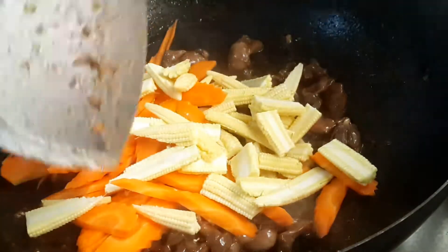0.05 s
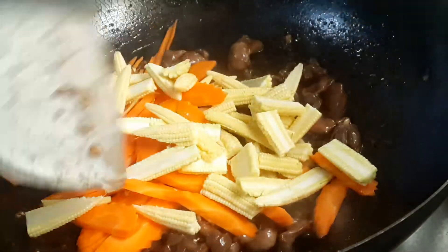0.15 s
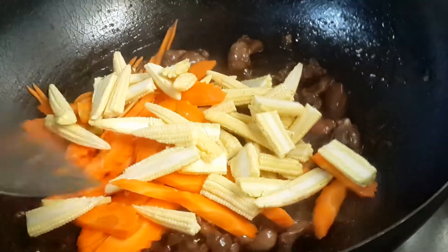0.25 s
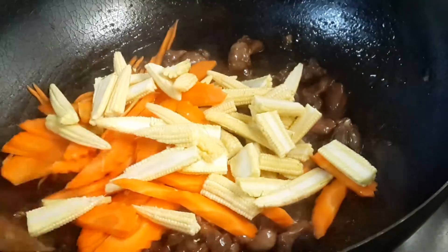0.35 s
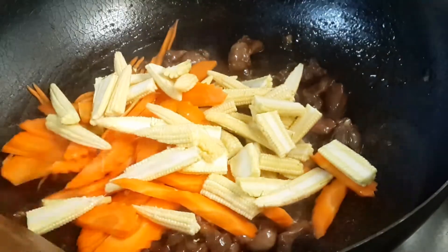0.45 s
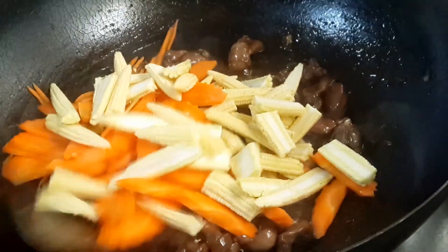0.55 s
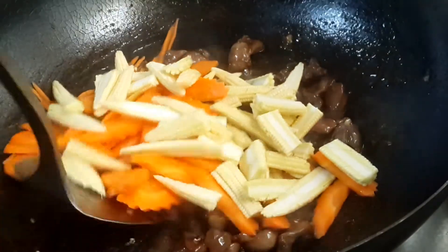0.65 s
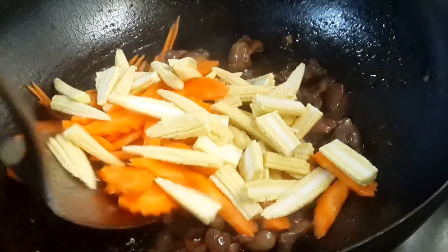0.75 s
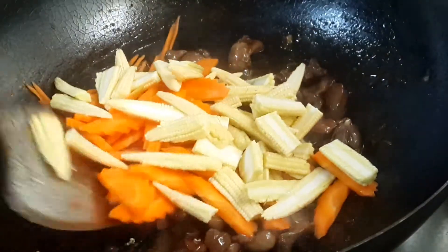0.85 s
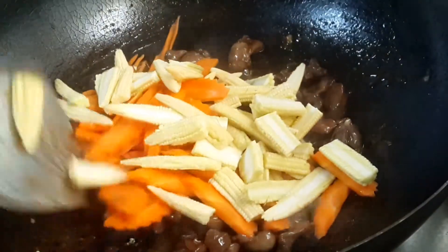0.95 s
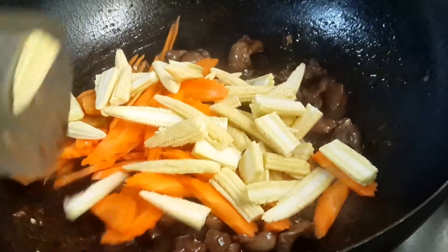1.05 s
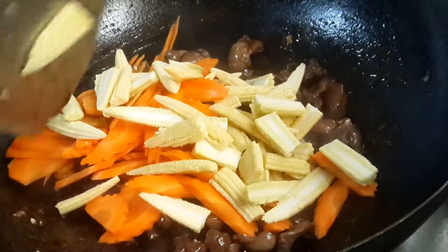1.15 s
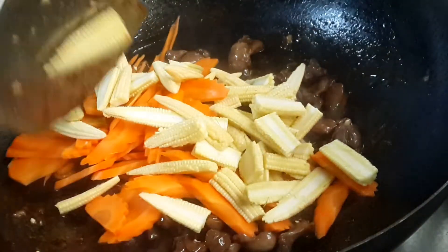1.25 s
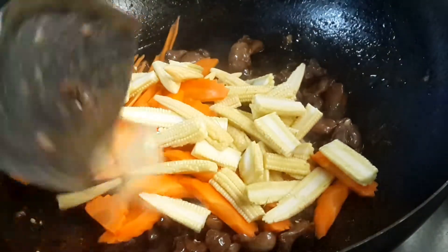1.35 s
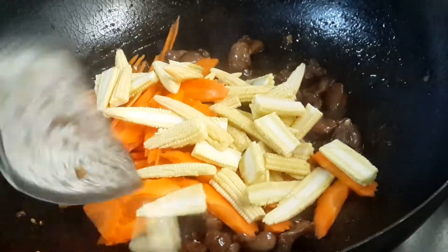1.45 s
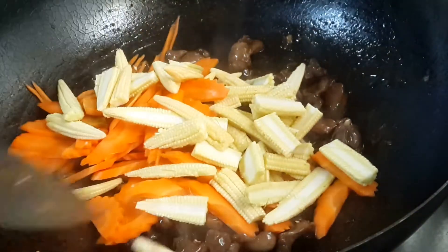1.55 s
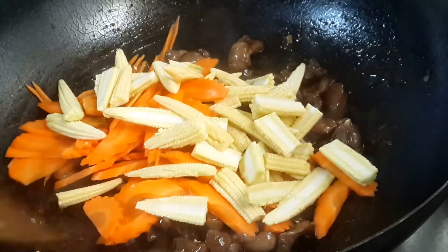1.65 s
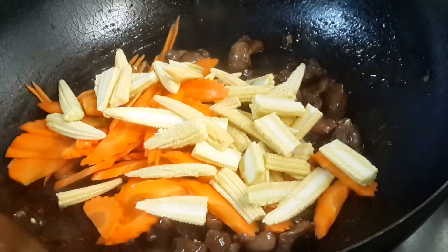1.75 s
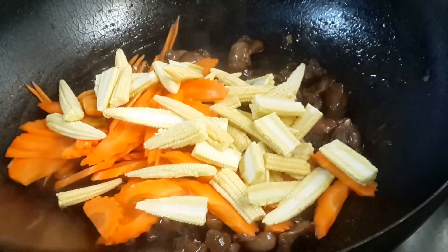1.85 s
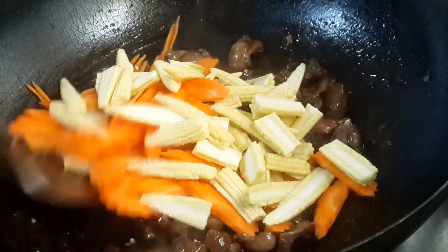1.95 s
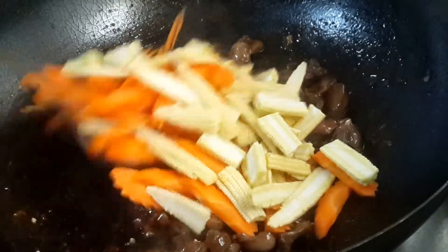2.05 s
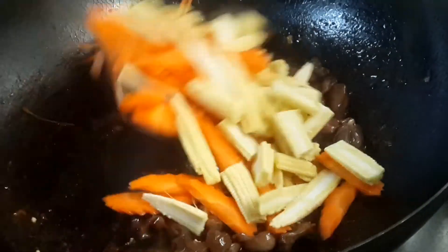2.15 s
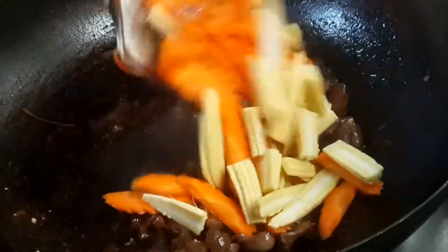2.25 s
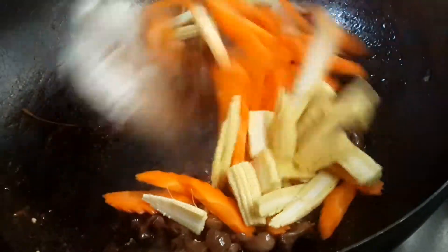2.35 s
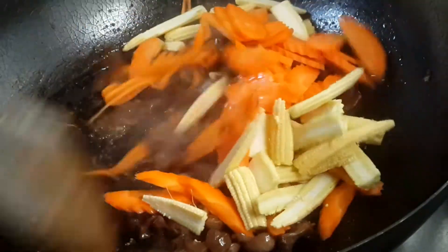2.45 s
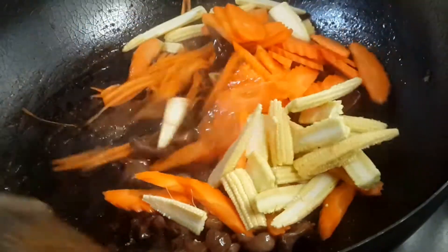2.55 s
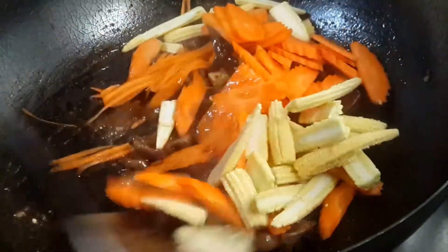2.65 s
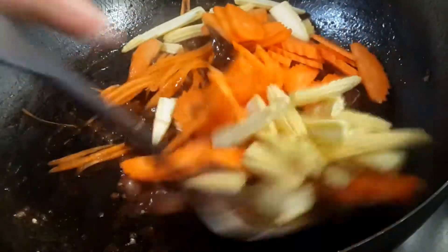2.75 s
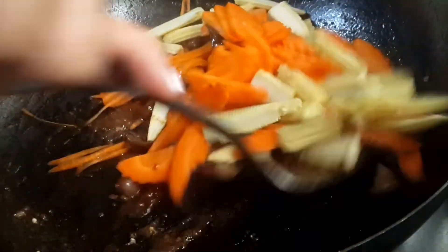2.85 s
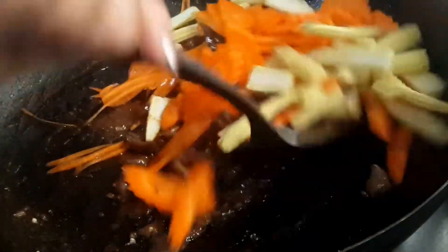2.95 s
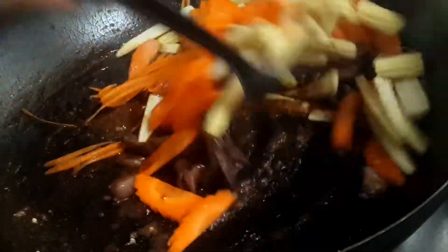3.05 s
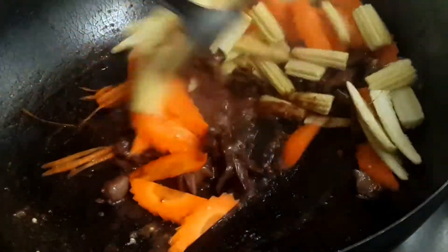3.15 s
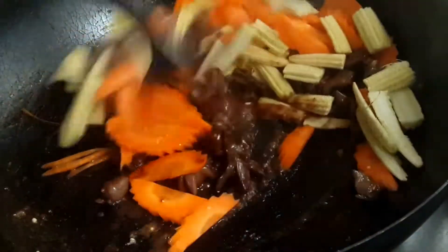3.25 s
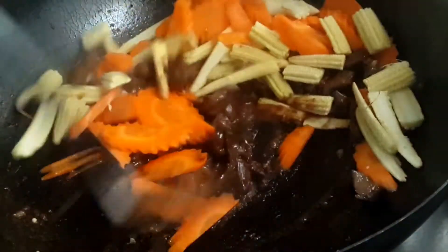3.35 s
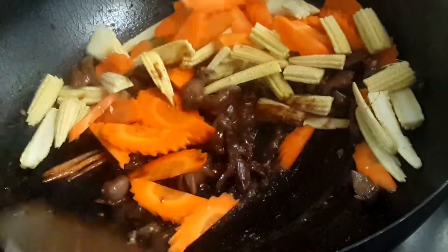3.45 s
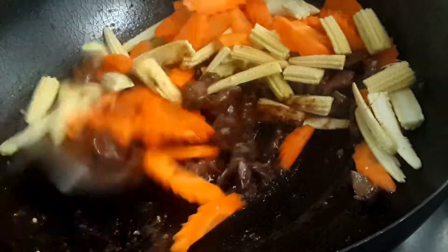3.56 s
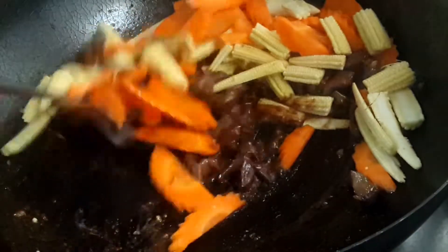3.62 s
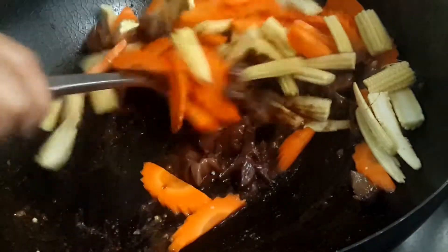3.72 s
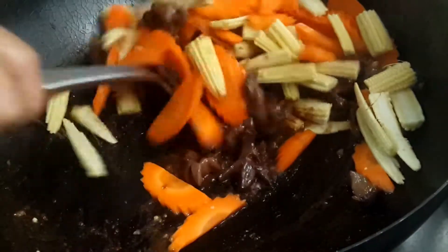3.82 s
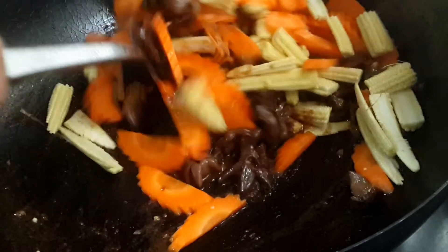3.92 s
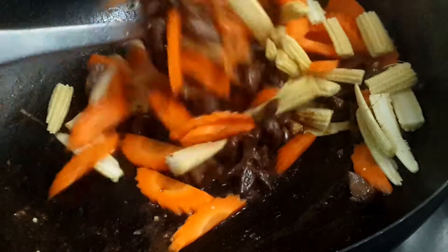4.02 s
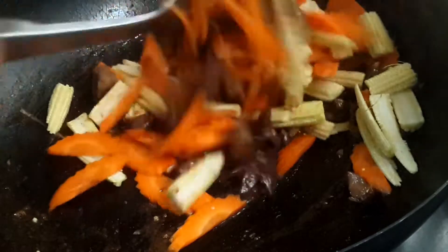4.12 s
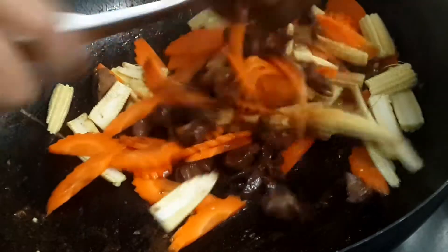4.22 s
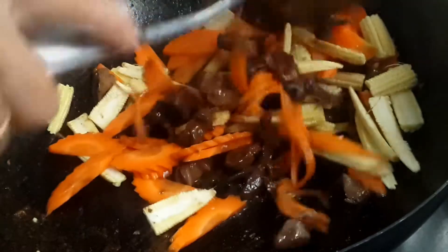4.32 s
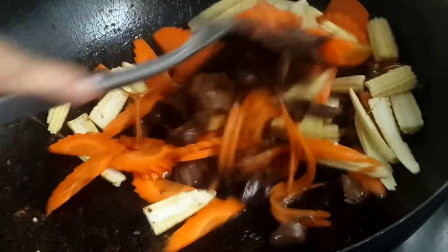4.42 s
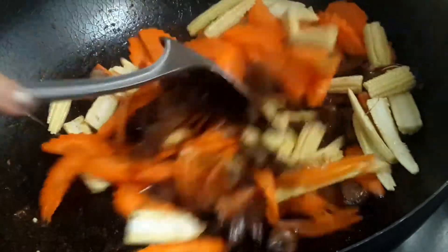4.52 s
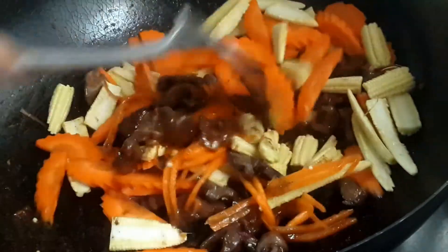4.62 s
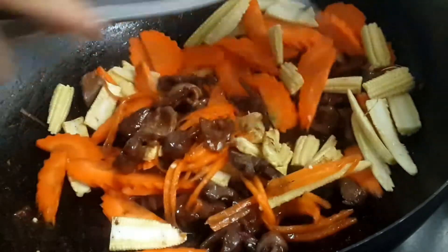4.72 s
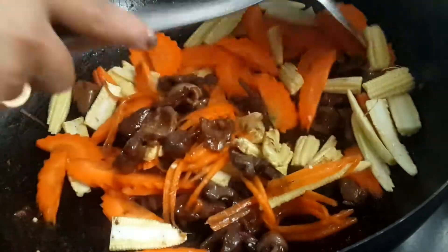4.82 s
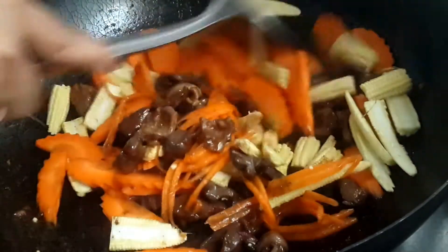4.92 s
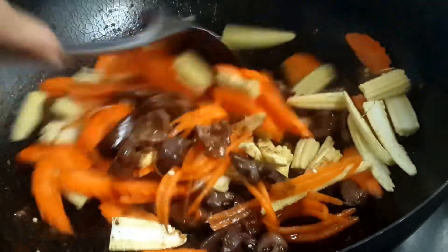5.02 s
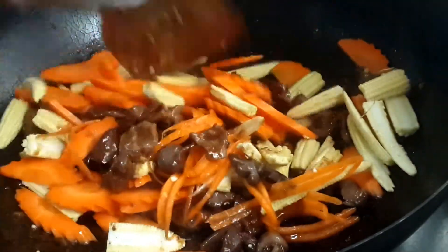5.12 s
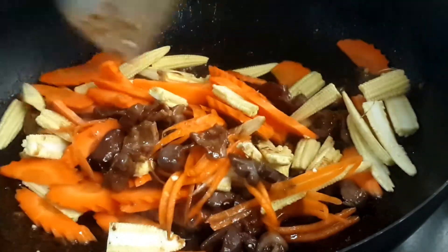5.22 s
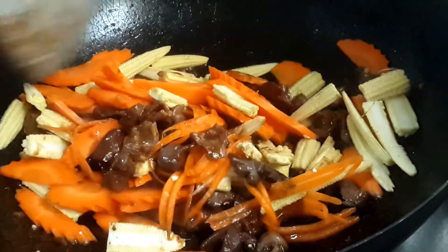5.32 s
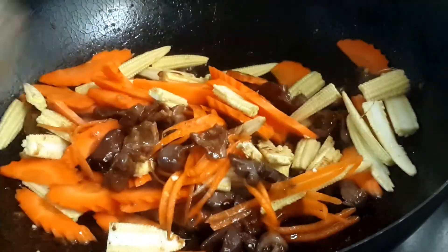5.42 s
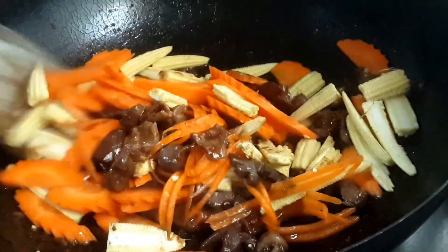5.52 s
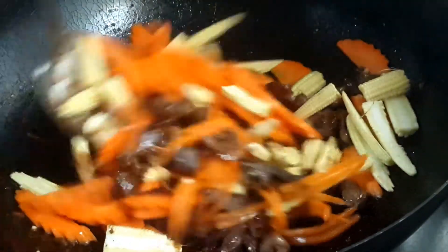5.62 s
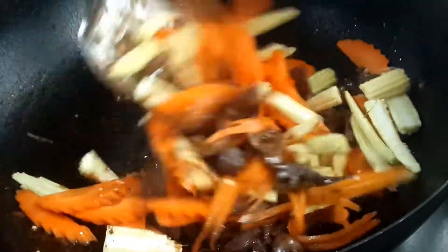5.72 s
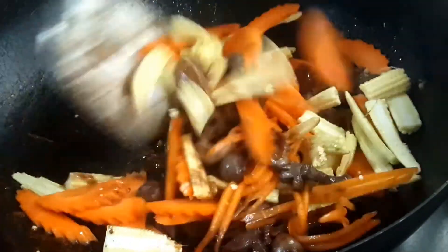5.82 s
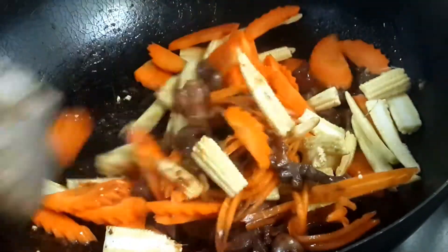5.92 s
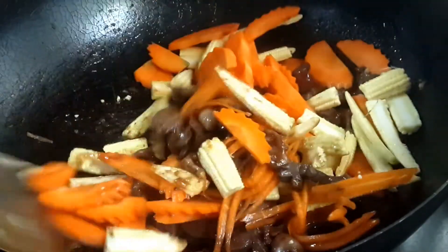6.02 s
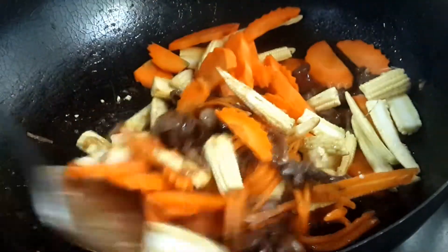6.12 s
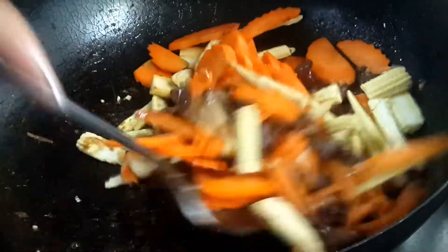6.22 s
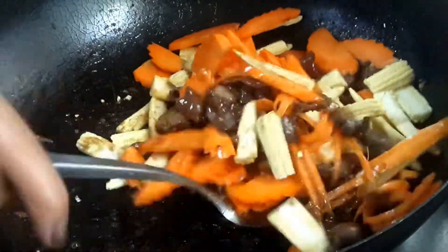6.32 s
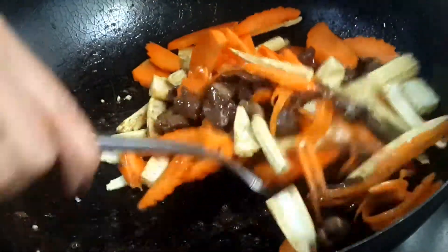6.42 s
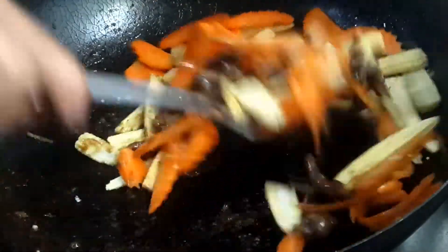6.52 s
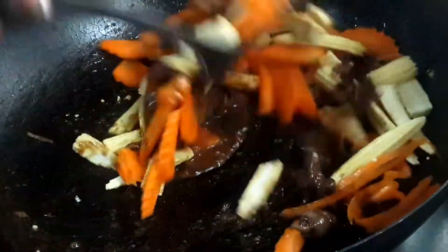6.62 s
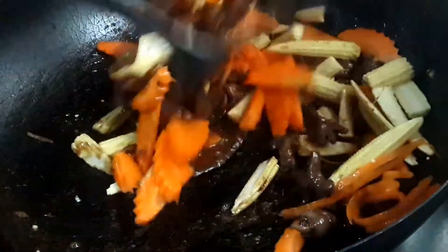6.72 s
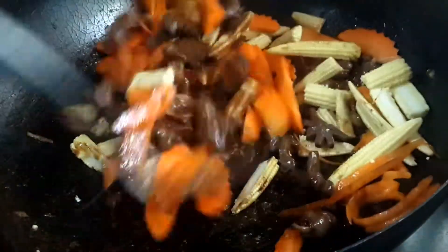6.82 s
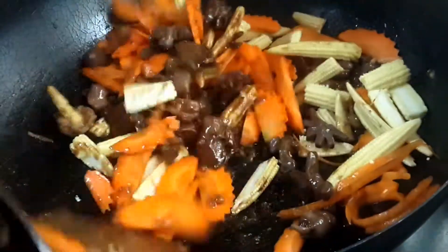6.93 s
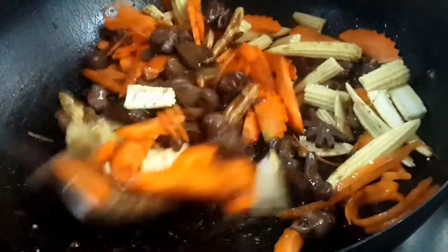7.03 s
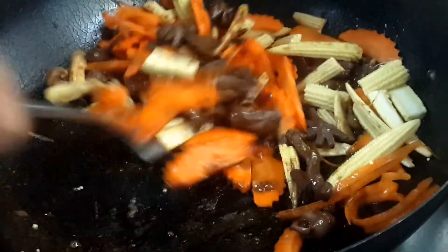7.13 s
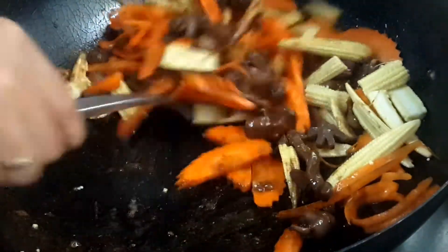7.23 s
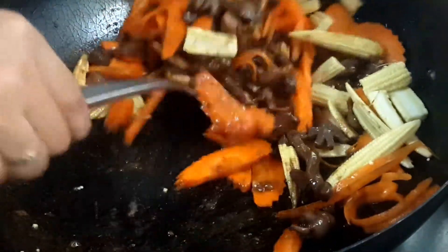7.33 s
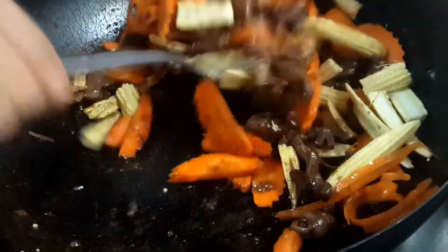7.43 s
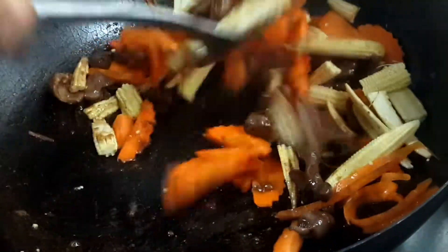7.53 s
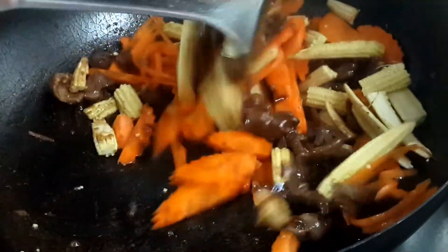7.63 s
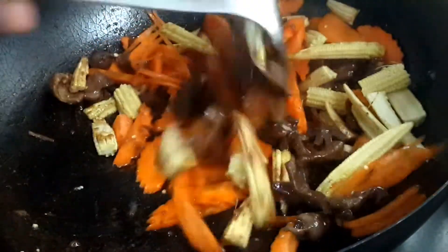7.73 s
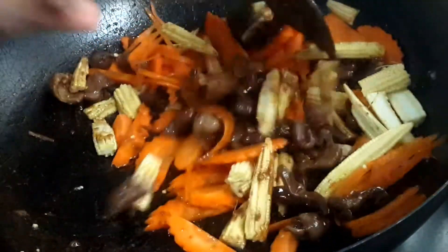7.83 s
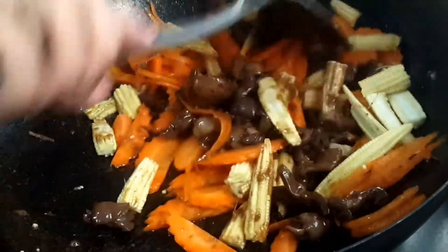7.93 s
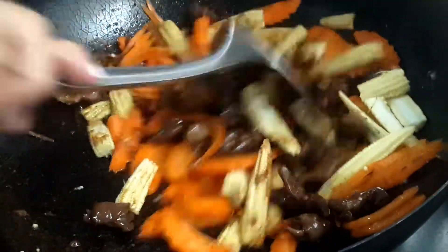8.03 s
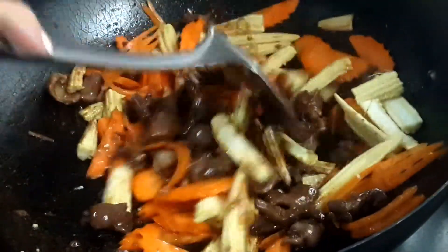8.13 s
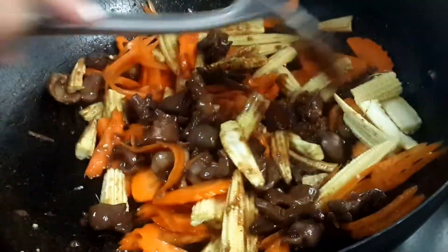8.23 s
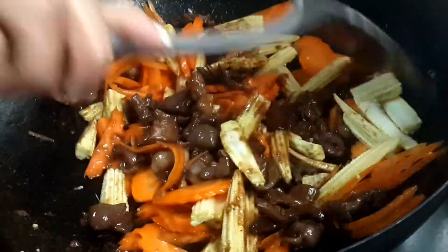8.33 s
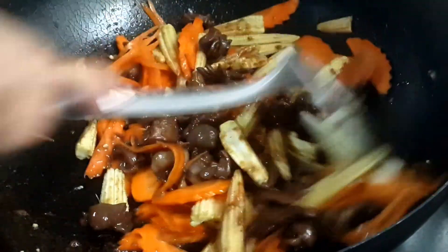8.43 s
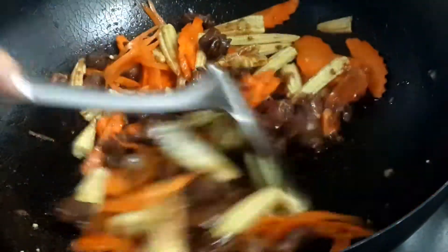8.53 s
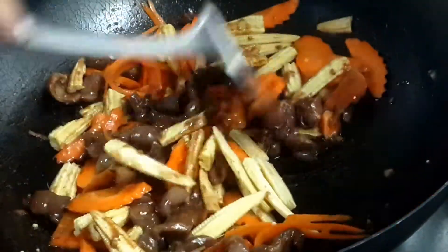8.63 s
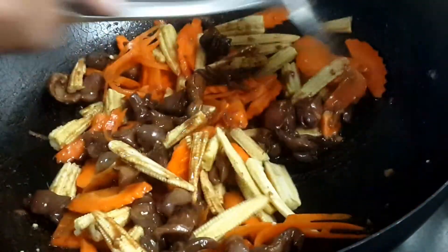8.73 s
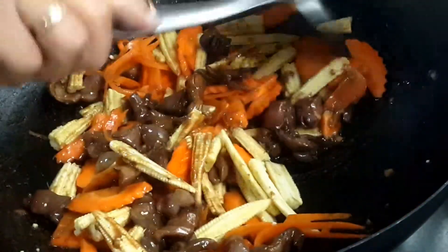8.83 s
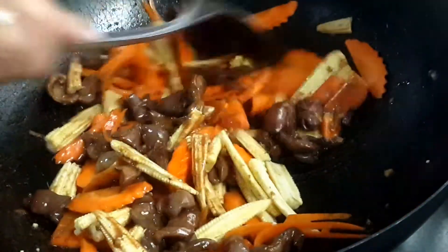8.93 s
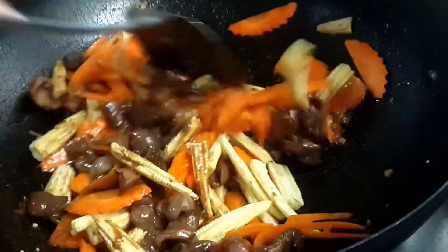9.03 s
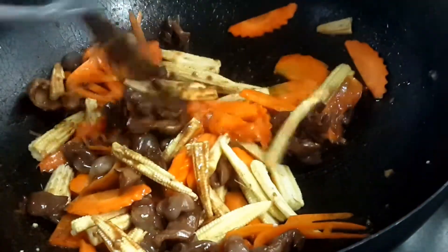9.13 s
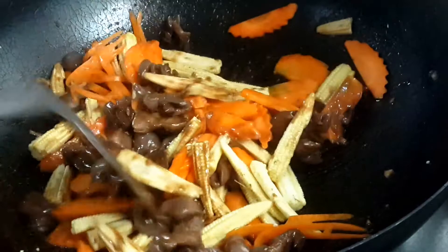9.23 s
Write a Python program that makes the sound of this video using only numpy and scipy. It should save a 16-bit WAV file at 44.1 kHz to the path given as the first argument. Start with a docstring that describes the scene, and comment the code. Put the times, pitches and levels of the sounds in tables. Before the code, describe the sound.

Heard close up in a small hard kitchen, vegetables sizzle and bubble in an oiled steel wok. A metal spatula strikes hard, scrapes grittily with brief squeals, then chatters in a run of clinks. Turned food patters and flops back, making the hiss flare. The sizzle thins midway, more blows and scrapes follow, and the end is mostly frying and soft bumps. Stereo, nearer on the left.

```python
"""A close sizzle comes first: vegetables in an oiled steel wok, built from random steam pops and wet bubbling.
A metal spatula then clacks, scrapes and at times squeals: gritty noise drives the modes of blade and pan.
Turned pieces flop and patter back and the sizzle flares; the spatula clinks and the wok booms and rocks on its stand.
Farthest back lie the stove's low filtered noise and the tail of a small hard kitchen.
Two microphones stand close by, the left one nearer; a peak limiter and a band limit follow."""
import sys
import numpy as np
from scipy import signal
from scipy.fft import rfft, irfft, next_fast_len
from scipy.io import wavfile
from scipy.ndimage import uniform_filter1d, minimum_filter1d

SR = 44100
rng = np.random.default_rng(int(sys.argv[2]) if len(sys.argv) > 2 else 0)


def wav_out(sig):
    """Save sig, one row per channel (or a flat mono array), as 16-bit PCM at SR to the path in sys.argv[1]."""
    wavfile.write(sys.argv[1], SR, np.round(np.clip(np.atleast_2d(sig).T, -1, 1) * 32767).astype(np.int16))


N = 408807
TIME = np.arange(N) / SR
EDGE_HZ = 15750  # top of the band


def amp(db):
    """Turns decibels into an amplitude factor."""
    return 10 ** (np.asarray(db) / 20)


def unit(x):
    """Scales to rms 1."""
    return x / np.sqrt(np.mean(x ** 2) + 1e-20)


def read(points, hz):
    """Reads a spectrum on a log-frequency axis."""
    f, value = np.transpose(points)
    return np.interp(np.log(hz + 1), np.log(f + 1), value)


def add(mix, s, sound):
    """Adds a two-channel sound at time s."""
    part = mix[:, max(round(s * SR), 0):][:, :sound.shape[-1]]
    part += sound[..., :part.shape[1]]


def colour(x, points, size=4096):
    """Minimum-phase filter with the shape of a spectrum; white noise keeps its power."""
    log_gain = np.log(amp(read(points, abs(np.fft.fftfreq(size, 1 / SR)))))
    response = np.exp(np.conj(signal.hilbert(log_gain)))
    taps = np.fft.ifft(response).real[:size // 2]
    taps = taps / np.linalg.norm(taps)
    return signal.oaconvolve(x, taps[None], axes=1)[:, :x.shape[1]]


def resonate(x, hz, width):
    """A fixed or gliding resonance; white noise keeps its power."""
    turn = np.exp(2j * np.pi * np.cumsum(hz * np.ones(x.shape[1])) / SR)
    r = np.exp(-np.pi * width / SR)
    # shift the resonance down to 0 Hz, smooth there, shift back
    smooth = signal.lfilter([np.sqrt(2 * (1 - r * r))], [1, -r], x / turn)
    return (turn * smooth).real


def body(x, modes):
    """Drives a set of resonances side by side."""
    return sum(amp(db) * resonate(x, hz, width) for hz, width, db in modes)


def pops(n, per_s, spread_db):
    """Random impulses, exponentially spread in dB, reaching two microphones with unlike strength."""
    size = amp(spread_db * np.minimum(rng.exponential(1, n), 4.5))
    size = size * (rng.random(n) < per_s / SR)
    return unit(size * rng.standard_normal((2, n)))


def burst(fade_s, rise_s, size=16384):
    """A rattle of tiny contacts: noise that swells fast and dies away."""
    t = np.arange(size) / SR
    return rng.standard_normal((2, size)) * np.exp(-t / fade_s) * (1 - np.exp(-t / rise_s))


def ring(modes, rise_s, size=16384):
    """One blow on a body: decaying modes, a quarter cycle apart in the two channels."""
    t = np.arange(size) / SR
    waves = sum(amp(db - 60 * t / t60) * np.exp(2j * np.pi * hz * t) for hz, db, t60 in modes)
    return np.array([waves.imag, waves.real]) * (1 - np.exp(-t / rise_s))


def steel(x, ring_s, share, count=60, span_hz=(2200, EDGE_HZ), size=2048):
    """The crowded modes of thin steel: a short ring, drawn anew for each place of contact."""
    t = np.arange(size) / SR
    hz = np.interp(np.arange(count) + rng.random(count), [0, count], span_hz)
    height = rng.standard_normal((count, 1))
    turn = rng.random((count, 1)) + rng.random((2, count, 1)) / 2  # phase in cycles, unlike at left and right
    waves = height * np.sin(2 * np.pi * (hz[:, None] * t + turn))
    tail = waves.sum(1) * np.exp(-t / ring_s)
    tail *= share / np.linalg.norm(tail, axis=1, keepdims=True)
    tail[:, 0] += 1  # the contact itself
    return signal.oaconvolve(x, tail, axes=1)[:, :x.shape[1]] / np.hypot(1, share)


# Steady frying, sinking while the food lies off the hot centre; relative levels
# t/s, steam hiss level/dB, wet bubbling level/dB, patter of pieces level/dB
STEADY_FRYING = [(0.0, -34.5, -36, -44.5), (0.8, -38, -38, -41), (0.93, -40, -41.5, -46.5),
                 (1.35, -41.5, -42, -47.5), (1.7, -37, -34, -42), (2.6, -40.5, -44.5, -45.5),
                 (3.6, -41, -47.5, -49), (4.08, -48, -55, -53.5), (4.55, -48.5, -54.5, -57),
                 (5.12, -40.5, -44.5, -42), (5.4, -38.5, -41, -46.5), (6.1, -41.5, -45, -44.5),
                 (6.7, -44.5, -50, -49), (7.05, -41.5, -57, -47), (7.6, -45.5, -53.5, -48),
                 (8.05, -40.5, -55, -43.5), (8.5, -39, -48.5, -49), (9.27, -42, -41.5, -46.5)]
# Turned food falling back on hot steel; relative levels
# t of the height/s, hiss level/dB, bubbling level/dB, fade/s
FLARES = [(2.25, -39, -37.5, 0.16), (2.93, -32.5, -35, 0.096), (4.681, -37, -39, 0.15),
          (5.16, -35.5, -37.5, 0.19), (5.83, -34, -33.5, 0.085), (8.272, -31, -38, 0.099),
          (8.72, -33, -36, 0.079), (9.18, -39, -52, .06)]
FLARE_RISE_S, FLARE_PATTER_DB = 0.081, -8.5  # how fast a flare swells; its patter relative to its bubbling


def frying():
    """Gains of hiss, bubbling and patter: steady frying plus the power of flares that swell and die away."""
    s, *columns = np.transpose(STEADY_FRYING)
    power = amp([np.interp(TIME, s, c) for c in columns]) ** 2
    for top_s, hiss_db, wet_db, fade_s in FLARES:
        t = TIME - top_s
        shape = np.exp(-np.where(t < 0, (t / FLARE_RISE_S) ** 2, t / fade_s))
        height = amp([hiss_db, wet_db, wet_db + FLARE_PATTER_DB])
        power = power + np.outer(height, shape) ** 2
    return np.sqrt(power)


# Spectrum of the fine steam: f/Hz, relative level/dB
STEAM_SPECTRUM = [(1470, -16.5), (2500, -13.5), (3690, -7.5), (4620, -4), (6860, -0.5), (9580, -8),
                  (14600, -14)]
# Spectrum of the wet bubbling: f/Hz, relative level/dB
BUBBLING_SPECTRUM = [(50, -47), (300, -19), (600, -4), (1200, -3), (2500, -1), (4000, -2), (6000, -7.5),
                     (10000, -68)]


def sizzle(hiss_gain, wet_gain):
    """Water bursts out of the hot oil: fine steam pops over coarser bubbling."""
    fizz = unit(pops(N, per_s=7000, spread_db=2.5) + 0.76 * rng.standard_normal((2, N)))
    hiss = colour(fizz, STEAM_SPECTRUM) + 0.2 * resonate(fizz, 6840, width=340)
    wet = colour(pops(N, per_s=5000, spread_db=-2.0), BUBBLING_SPECTRUM)
    return unit(hiss) * hiss_gain + wet * wet_gain


# The spatula pushed along the pan; relative levels
# start t/s, end t/s, hardest push t/s, blade friction level there/dB, swell towards it/dB,
# brightness/(dB per octave), blade resonance f/Hz, pan level halfway/dB, its growth over the stroke/dB,
# first pan resonance f/Hz
STROKES = [(0.546, 0.693, 0.68, -23.5, -4.5, 3, 4800, -37.5, -12, 1100),
           (0.739, 0.769, 0.757, -27.5, 14, 1.5, 4360, -34.5, -3, 1480),
           (1.891, 1.992, 1.96, -22, 3, 2, 4400, -31.5, -4, 920),
           (2.025, 2.269, 2.036, -25.5, 10.5, 0.5, 4080, -37.5, 1, 970),
           (2.699, 2.759, 2.74, -27.5, 10, 5.5, 4240, -33.5, 5, 650),
           (3.635, 3.868, 3.785, -22, 8, 1, 4000, -37, 10.5, 800),
           (5.628, 5.705, 5.68, -26.5, 8, 3, 4230, -32, -15, 930),
           (5.7, 5.767, 5.725, -19.5, 8, 4, 3840, -40, -2, 1450),
           (6.285, 6.448, 6.31, -22.5, 7, -2, 4220, -34.5, 10.5, 840),
           (7.107, 7.395, 7.29, -25.5, 5.5, 1, 4000, -36.5, 7.5, 840)]
# Spectrum of the steel blade: f/Hz, relative level/dB
BLADE_SPECTRUM = [(1180, -49), (2000, -3), (3650, -0.5), (4200, 5.5), (5930, 3), (6700, 6.5), (10800, -6.5),
                  (15000, -12)]
# Spectrum of the pan's answer: f/Hz, relative level/dB
PAN_SPECTRUM = [(90, -47), (150, 2.5), (350, -3.5), (550, 5), (1000, 5), (2400, 3.5), (4000, -7),
                (8000, -21.5)]
# The blade's own ring under friction: f/Hz, relative level/dB
EDGE_MODES = [(5050, 6), (6230, -6), (6850, 4), (8820, 1)]
BLADE_HZ = 4200  # blade resonance at which its spectrum stays unshifted
PUSH_S, TOUCH_S, LIFT_S = 0.11, 0.00063, .014  # half width of the push; the blade takes hold; it leaves the pan
PLACE_S = .04  # time between neighbouring places of contact
WALL_SINK_OCTAVES_PER_S = 3.1  # the pan's resonance sinks as the blade slides from the wall to the bottom


def scrape(start, end, push_s, blade_db, swell_db, tilt_db, blade_hz, pan_db, growth_db, wall_hz):
    """The edge sticks and slips in gritty clusters; blade and pan ring anew at each place that it passes."""
    t = np.arange(start, end + LIFT_S * np.log(100), 1 / SR)
    contact = np.minimum((t - start) / TOUCH_S, 1) * np.exp(-np.maximum(t - end, 0) / LIFT_S)
    push = np.exp(-((t - push_s) / PUSH_S) ** 2)
    way = np.minimum((t - start) / (end - start), 1)
    judder = amp(2.1 * unit(uniform_filter1d(rng.standard_normal(len(t)), size=160)))
    slips = pops(len(t), per_s=3600, spread_db=2.0) * judder

    # crossfade at equal power from each place of contact to the next
    place = (t - start) / PLACE_S
    touches = [slips * np.sqrt(np.maximum(1 - abs(place - k), 0)) for k in range(int(place[-1]) + 2)]

    edge = sum(steel(x, ring_s=0.0031, share=10.0, count=52) for x in touches)
    tilted = [(hz * blade_hz / BLADE_HZ, db + tilt_db * np.log2(hz)) for hz, db in BLADE_SPECTRUM]
    singing = sum(amp(db) * resonate(slips, hz, width=91) for hz, db in EDGE_MODES)
    blade = unit(unit(colour(edge, tilted)) + 0.33 * unit(singing))

    wall = sum(steel(x, ring_s=0.021, share=0.43, count=14, span_hz=(900, 2600)) for x in touches)
    pan_hz = wall_hz * 2 ** (-WALL_SINK_OCTAVES_PER_S * (t - start))
    pan = unit(colour(wall, PAN_SPECTRUM) + resonate(slips, pan_hz, width=106))

    blade_gain = amp(blade_db - swell_db * (1 - push))
    pan_gain = amp(pan_db + growth_db * (way - .5))
    return start, contact * (blade * blade_gain + pan * pan_gain)


# The sliding edge catches and one resonance sings, high in the blade or low in the bowl
# start t/s, end t/s, relative level/dB, first f/Hz, last f/Hz
SQUEALS = [(0.667, 0.704, -29.5, 5060, 5070), (0.744, 0.753, -23, 5600, 5360),
           (2.018, 2.062, -34, 1950, 1890), (3.714, 3.745, -40, 3970, 4330), (3.755, 3.791, -37, 460, 603),
           (6.369, 6.475, -41, 420, 694), (7.098, 7.132, -31, 2870, 2990), (7.271, 7.341, -31, 517, 604),
           (7.876, 7.915, -34, 473, 387)]
SQUEAL_RISE_S, SQUEAL_FADE_S = 0.00086, 0.012
SQUEAL_WIDTH_HZ = 54  # for a first pitch of 1 kHz; grows with the root of that pitch


def squeal(start, end, db, first_hz, last_hz):
    """Friction feeds one narrow resonance, which glides as the point of contact moves."""
    t = np.arange(0, end - start + SQUEAL_FADE_S * np.log(100), 1 / SR)
    release = np.exp(-np.maximum(t - (end - start), 0) / SQUEAL_FADE_S)
    grip = (1 - np.exp(-t / SQUEAL_RISE_S)) * release
    hz = np.interp(t, [0, end - start], [first_hz, last_hz])
    width = SQUEAL_WIDTH_HZ * np.sqrt(first_hz / 1000)
    friction = rng.standard_normal((2, len(t)))
    tone = resonate(resonate(friction, hz, width), hz, 10 * width)
    return start, amp(db) * grip * np.array([unit(x) for x in tone])


# The blade hits the pan: t/s, relative level/dB, strongest resonance f/Hz, chatter decay/s
CLACKS = [(0.437, -8.5, 4760, 0.0056), (0.5425, -1, 6960, 0.011), (0.677, -16.5, 5050, 0.0096),
          (0.7437, -16.5, 5500, 0.0041), (1.4414, -14.5, 4900, 0.0019), (1.52, -14, 6300, 0.0011),
          (1.883, -4.5, 7490, 0.0096), (2.0215, -8, 5200, 0.0033), (2.156, -15.5, 5460, 0.0063),
          (2.1837, -11.5, 5200, 0.004), (2.569, -20, 5500, 0.0018), (2.6958, -12.5, 5400, 0.0094),
          (2.795, -13.5, 5140, 0.013), (3.6271, -3.5, 4530, 0.0079), (3.644, -1.5, 6000, 0.0041),
          (3.7407, -7.5, 4370, 0.0012), (3.82, -11, 4300, 0.0035), (4.8986, -24, 3570, 0.0016),
          (5.6214, -3.5, 4600, 0.0091), (6.011, -14, 6600, 0.0015), (6.16, -4, 8100, 0.011),
          (6.286, -17.5, 5600, 0.011), (6.3942, -4.5, 5130, 0.0043), (6.422, -14, 5400, 0.0047),
          (6.532, -16, 4630, 0.0038), (6.55, -12.5, 4570, 0.0076), (6.566, -9.5, 4800, 0.0049),
          (7.099, -4.5, 4370, 0.0034), (7.3527, -7, 4300, 0.0048)]
BLADE_MID_HZ = 5200  # strongest resonance at which the blade's spectrum stays unshifted


def clacks():
    """The blade chatters as it lands flat; its corner gives only a tick."""
    out = np.zeros((2, N))
    for s, db, hz, chatter_s in CLACKS:
        blow = steel(burst(chatter_s, rise_s=chatter_s * 0.15), ring_s=0.0046, share=0.64)
        width = 160 + 0.49 / chatter_s  # a brief touch hardly sets one resonance going
        # a stiffer spot shifts the whole ring upwards
        shift = np.sqrt(hz / BLADE_MID_HZ)
        edge = [(f * shift, level) for f, level in BLADE_SPECTRUM]
        blade = colour(blow, edge) + 0.55 * resonate(blow, hz, width)
        add(out, s, amp(db - 4.5) * (blade + 0.32 * colour(blow, PAN_SPECTRUM)))
    return out


# The free blade bounces, and twists when its corner lands
# t/s, relative level/dB, twisting modes' relative level/dB
CLINKS = [(1.569, -5.5, -12), (1.585, 2.5, 2), (1.597, -9.5, 17), (1.656, -6.5, -9), (1.72, -3, -1),
          (1.742, -7.5, 2), (1.761, -9, -7), (1.789, -12, -4)]
# Bending modes of the free blade: f/Hz, width/Hz, relative level/dB
BENDING = [(1036, 130, 3.5), (2460, 820, -0.5), (3524, 55, -0.5)]
# Twisting modes of the free blade: f/Hz, width/Hz, relative level/dB
TWISTING = [(4400, 55, -1), (5620, 80, -9), (6670, 33, -7.5)]


def clinks():
    """The loose spatula chatters on the pan and rings in bending and twisting modes."""
    out = np.zeros((2, N))
    for s, db, twist_db in CLINKS:
        contact = burst(fade_s=0.0063, rise_s=0.0011)
        modes = body(contact, BENDING) + amp(twist_db) * body(contact, TWISTING)
        add(out, s, amp(db - 20.5) * (modes + 0.043 * colour(contact, BLADE_SPECTRUM)))
    return out


# Dull knocks on the wok through the food
# t/s, relative level/dB, extra damping by the resting blade/(dB per s)
KNOCKS = [(7.769, -10.5, 0), (7.854, -10, 260), (7.926, -35, 0)]
# Boom of the knocked bowl: f/Hz, relative level/dB, t60/s
WOK_MODES = [(507, -9, 0.18), (544, 3.5, 0.027), (878, -17.5, 0.083), (1460, -14.5, 0.028),
             (1543, -19, 0.052), (2020, -16.5, 0.024)]


def knocks():
    """The wok's bowl booms in a few decaying modes and shudders when knocked."""
    out = np.zeros((2, N))
    for s, db, damping in KNOCKS:
        shudder = resonate(burst(fade_s=0.039, rise_s=0.0033), 390, width=200)
        boom = ring(WOK_MODES, rise_s=0.002) * amp(-damping * TIME[:shudder.shape[1]])
        add(out, s, amp(db + 3.0) * (boom + 0.045 * shudder))
    return out


# The wok rocks on its stand: t/s, relative level/dB, rattle decay/s, rim clang relative level/dB
THUDS = [(0.389, -15.5, 0.032, -21), (.438, -4.5, 0.031, -13), (.493, -8.5, 0.022, -12),
         (6.162, -16.5, 0.057, 7), (6.189, -18.5, 0.1, 3), (8.097, -16.5, 0.025, -18),
         (9.022, -14.5, 0.014, -16), (9.068, -20, 0.036, -24), (9.149, -15, 0.0095, -35)]
# Spectrum of the stand's rattle: f/Hz, relative level/dB
STAND_SPECTRUM = [(60, -37), (115, -3), (170, 4), (270, -0.5), (500, -6.5), (2500, -25)]
# The wok's low hum: f/Hz, width/Hz, relative level/dB
BOWL_MODES = [(135.4, 11.6, -5.5), (258.5, 7.5, -15), (378.4, 25, -12.5), (520, 14, -15)]
# Clang of the rim: f/Hz, relative level/dB, t60/s
RIM_MODES = [(907, 1.5, 0.18), (1090, 1, 0.15), (1267, -4, 0.35), (1370, -0.5, 0.11), (1852, 7, 0.075)]


def thuds():
    """Shoved, the wok rattles on its stand, its bowl hums and its rim clangs."""
    out = np.zeros((2, N))
    for s, db, rattle_s, clang_db in THUDS:
        contact = burst(rattle_s, rise_s=0.0018)
        rattle = 0.93 * colour(contact, STAND_SPECTRUM) + 0.62 * body(contact, BOWL_MODES)
        clang = amp(clang_db) * ring(RIM_MODES, rise_s=0.00029)
        add(out, s, amp(db - 14.5) * (rattle + clang))
    return out


# Soft pieces flop onto the pan: t/s, relative level/dB, pitch f/Hz
FLOPS = [(2.39, -28, 380), (3.448, -32.5, 587), (4.138, -37.5, 790), (4.553, -37.5, 430), (4.715, -29, 264),
         (5.017, -32, 544), (5.06, -29, 485), (5.288, -32, 360), (6.885, -32.5, 476), (6.922, -29.5, 490),
         (6.992, -36, 302), (7.58, -41, 452), (8.383, -30.5, 382), (8.533, -32, 377), (8.667, -35, 374),
         (8.85, -31, 390)]
# The pan's answer, one mode: f/Hz, relative level/dB, t60/s
FLOP_OVERTONE = (810, -6, 0.055)
FLOP_RING_S, SQUASH_S = 0.049, 0.015  # t60 of the bump; decay as a soft piece settles


def flops():
    """Big pieces land with a hollow, quickly damped bump that also stirs the wok on its stand."""
    out = np.zeros((2, N))
    for s, db, hz in FLOPS:
        bump = ring([(hz, 0, FLOP_RING_S), FLOP_OVERTONE], rise_s=0.0025)
        stir = colour(burst(SQUASH_S, rise_s=0.0013), STAND_SPECTRUM)
        add(out, s, amp(db) * (bump + 0.15 * stir))
    return out


# Spectrum of small falling pieces: f/Hz, relative level/dB
PLOP_SPECTRUM = [(70, -35), (100, -14.5), (135, 9.5), (220, -1.5), (450, -3.5), (700, -16), (1200, -17),
                 (3000, -34)]


def tumble(patter_gain):
    """Small pieces patter on the pan as random impulses and make its bowl hum."""
    drops = pops(N, per_s=1200, spread_db=0.5)
    sparse = pops(N, per_s=50, spread_db=-5.5)
    bumps = resonate(resonate(sparse, 448, width=91), 810, width=200)
    patter = colour(drops, PLOP_SPECTRUM) + body(drops, BOWL_MODES) + .45 * unit(bumps)
    return unit(patter) * patter_gain


# The stove under the wok: t/s, relative level/dB
STOVE_LEVEL = [(.5, -57), (.9, -60), (2.4, -67), (4.2, -76), (9.27, -71)]
# Spectrum of its rumble: f/Hz, relative level/dB
RUMBLE_SPECTRUM = [(32, -32), (45, -9), (62, 14), (120, 3), (300, -71)]


def stove():
    """The stove rumbles: low filtered noise at a slowly moving level."""
    rumble = colour(rng.standard_normal((2, N)), RUMBLE_SPECTRUM)
    return rumble * amp(np.interp(TIME, *np.transpose(STOVE_LEVEL)))


# Decay of the kitchen: f/Hz, t60/s
KITCHEN_DECAY = [(150, 0.64), (600, 0.36), (3000, 0.46), (12000, 0.21)]


def kitchen(x):
    """A small hard room: a diffuse tail of decaying noise whose treble dies first."""
    late = np.arange(SR // 2) > .005 * SR
    hz, t, z = signal.stft(rng.standard_normal((2, SR // 2)) * late, SR, nperseg=256)
    decay = amp(-60 * t / read(KITCHEN_DECAY, hz)[:, None])
    tail = signal.istft(z * decay, SR, nperseg=256)[1]
    return signal.oaconvolve(x, tail / np.linalg.norm(tail[0]), axes=1)[:, :N]


# Likeness of the two microphones: f/Hz, left-right coherence
LIKENESS = [(250, 0.97), (500, 0.86), (1000, 0.39), (2000, 0.31), (12000, 0.17)]
# Phase by which the left microphone leads: f/Hz, lead/rad
LEFT_LEAD = [(500, 0.095), (1400, 0.18), (2500, 1.9), (7000, 1.43), (12000, 2.1)]
# Level difference of the microphones: f/Hz, left minus right level/dB
LEFT_LEAN = [(150, 2.5), (300, 3.5), (1000, 3.5), (3000, 3.5), (5500, 7), (7000, 8), (9000, -3.5),
             (13000, 3.5)]


def microphones(x):
    """Two microphones hear the bass alike and the treble differently; the left one is nearer."""
    size = next_fast_len(N + SR // 10)
    hz = np.fft.rfftfreq(size, 1 / SR)
    a, b = rfft(x, size)
    same = np.clip(read(LIKENESS, hz), 0, .995)
    far = amp(-read(LEFT_LEAN, hz))
    shared = far * same * np.exp(-1j * read(LEFT_LEAD, hz))
    own = far * np.sqrt(1 - same ** 2)
    centre = np.hypot(abs(1 + shared), own) / 2  # level of the left-right mean, divided out
    return irfft(np.array([a, shared * a + own * b]) / centre, size)[:, :N]


def scene():
    """Spatula, wok and flops sound into the kitchen, over frying, patter and stove."""
    metal = clacks() + clinks() + knocks() + thuds() + flops()
    for row in STROKES:
        add(metal, *scrape(*row))
    for row in SQUEALS:
        add(metal, *squeal(*row))
    low_cut = signal.butter(3, 95, "high", fs=SR, output="sos")
    metal = signal.sosfilt(low_cut, metal)
    hiss_gain, wet_gain, patter_gain = frying()
    food = sizzle(hiss_gain, wet_gain) + tumble(patter_gain)
    return microphones(metal + amp(-8.5) * kitchen(metal) + food + stove())


LIMIT_DB, LOOK_AHEAD_S, RECOVER_DB_PER_S = -1, 0.017, 500  # the recorder's peak limiter


def record(dry):
    """A limiter ducks just ahead of the hardest blows and recovers quickly; then the band limit."""
    size = 2 * int(LOOK_AHEAD_S * SR / 2) + 1
    over_db = np.maximum(20 * np.log10(abs(dry).max(0) + 1e-9) - LIMIT_DB, 0)
    recovery_db = RECOVER_DB_PER_S * TIME
    held_db = np.maximum.accumulate(over_db + recovery_db) - recovery_db
    gain_db = uniform_filter1d(minimum_filter1d(-held_db, 2 * size + 1), size)
    limited = dry * amp(gain_db)
    band = signal.firwin(301, EDGE_HZ, window=("kaiser", 8), fs=SR)
    return signal.oaconvolve(limited, band[None], "same")


dry = scene()
out = record(dry)
wav_out(out)
```